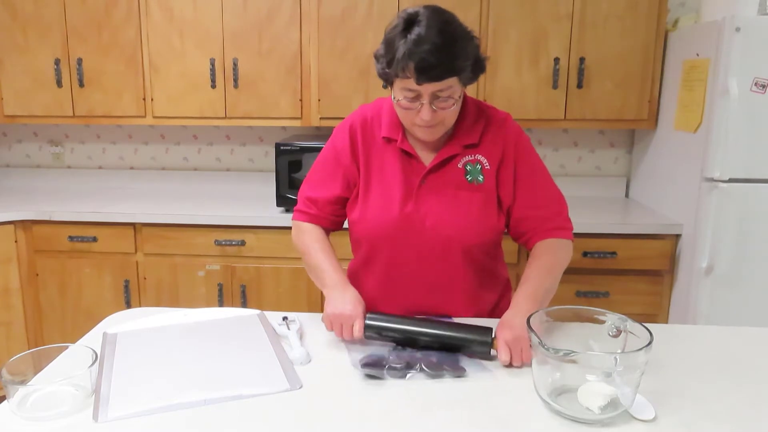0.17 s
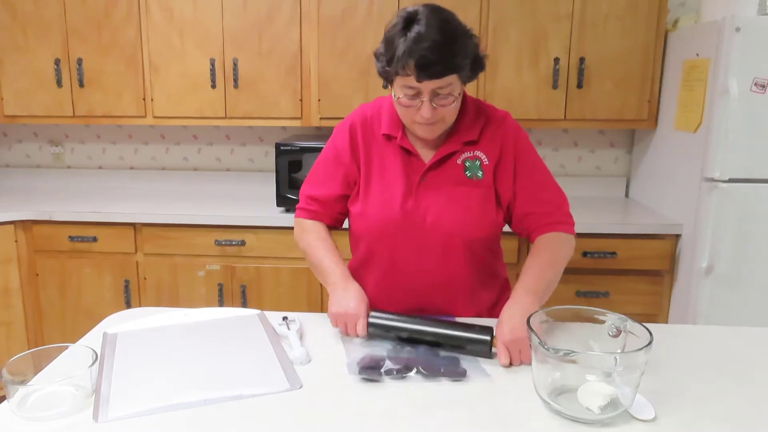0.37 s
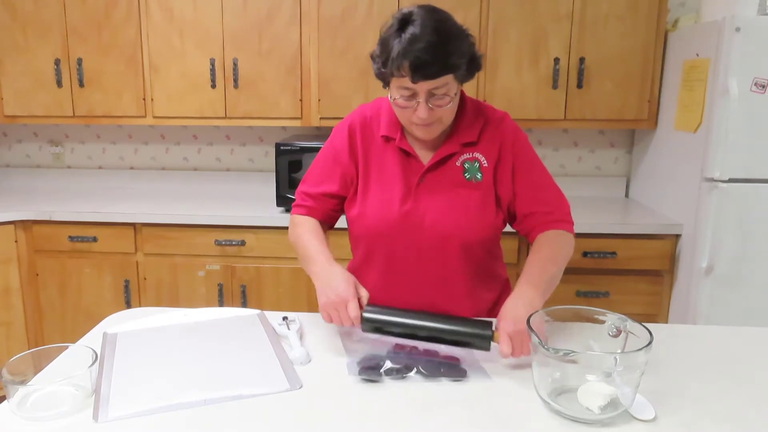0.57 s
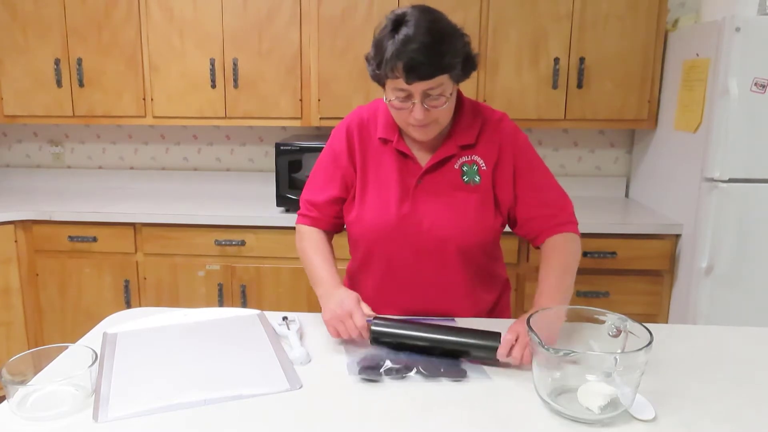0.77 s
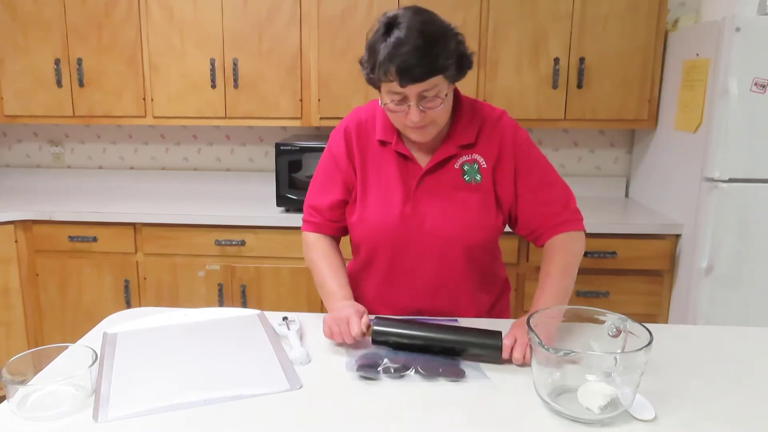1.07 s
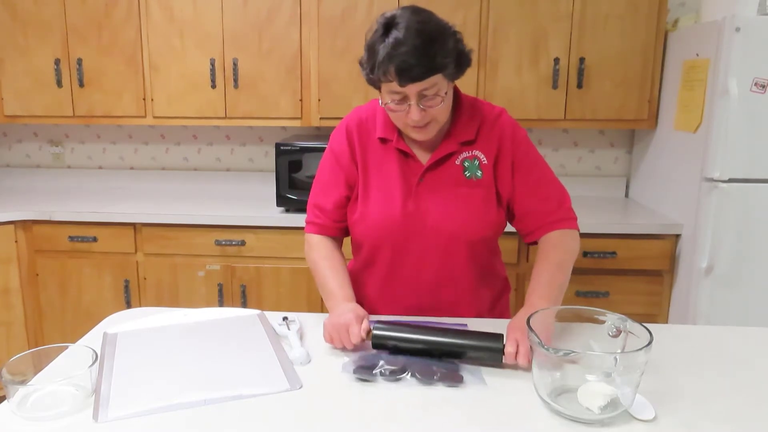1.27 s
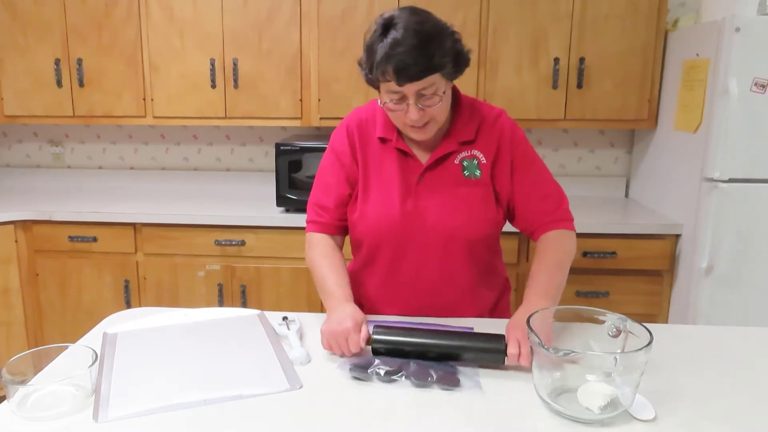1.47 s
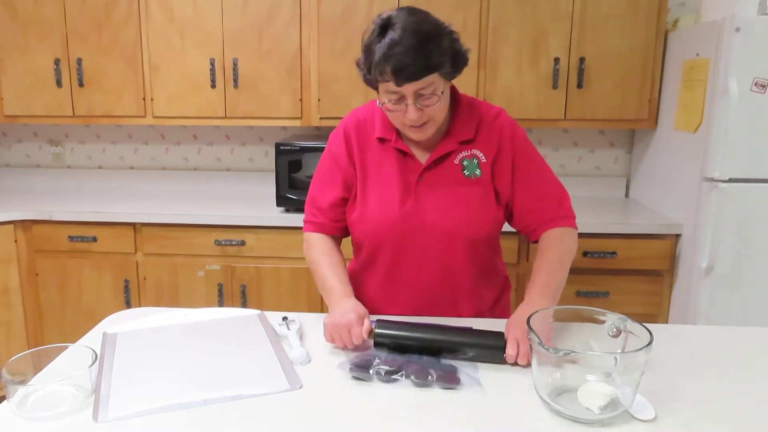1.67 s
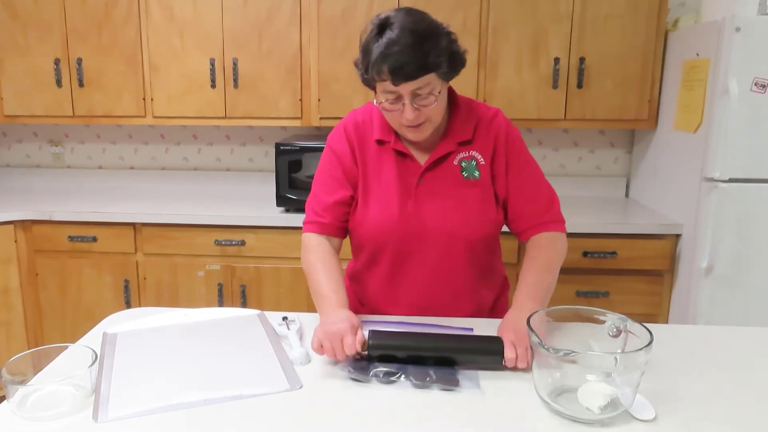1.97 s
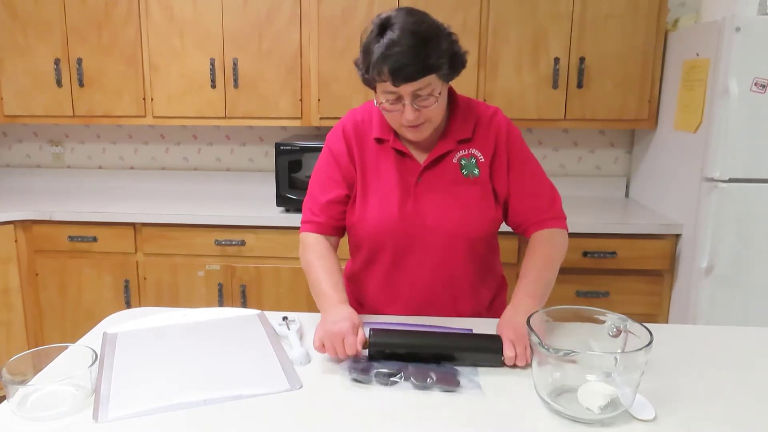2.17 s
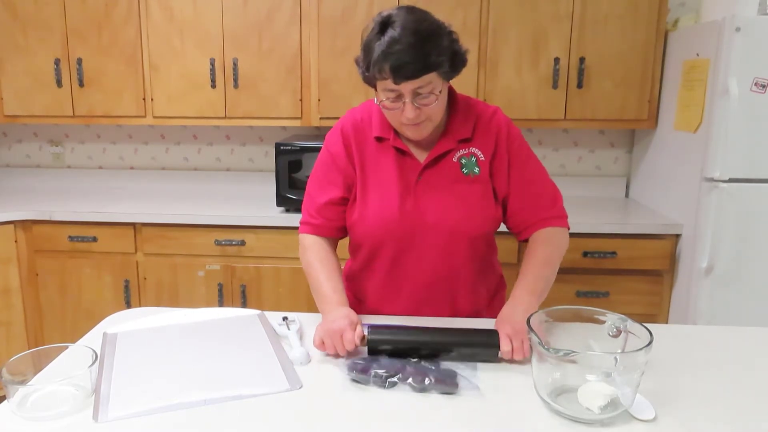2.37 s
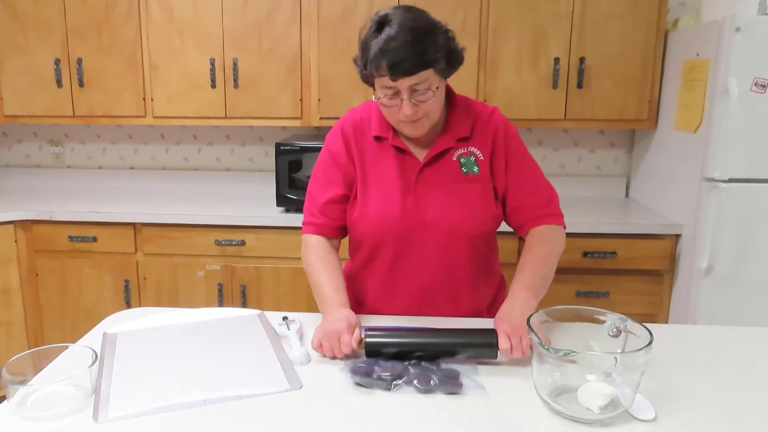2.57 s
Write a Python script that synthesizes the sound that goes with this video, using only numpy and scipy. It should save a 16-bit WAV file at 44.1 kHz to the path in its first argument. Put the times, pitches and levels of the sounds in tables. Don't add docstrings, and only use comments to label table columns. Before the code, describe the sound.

Gritty cookie crunching under a hollow rolling pin, starting faint, then a sharp crack and thuds, short grinding bursts with pauses, plastic rustle and a late handle click, heard fairly close in a small kitchen with little echo.

```python
import sys
import numpy as np
from scipy import signal
from scipy.fft import rfft, irfft, next_fast_len
from scipy.io import wavfile

SR = 44100
rng = np.random.default_rng(int(sys.argv[2]) if len(sys.argv) > 2 else 0)


def elevation(decibels):
    levels = np.asarray(decibels, float)
    return 10 ** (levels / 20)


def wav_out(sig):
    wavfile.write(sys.argv[1], SR, np.round(np.clip(np.atleast_2d(sig).T, -1, 1) * 32767).astype(np.int16))


N = 121275

# pitch_hz, density_db [dB per Hz]
GRIT_SPECTRUM = [(800, -12), (1200, 3), (1750, -5.5), (2450, 1.5), (3600, -4), (6500, -8.5), (13500, -23.5),
                 (16000, -23)]
# pitch_hz, level_db, t60_s
TABLE_MODES = [(185, -3, 0.06), (235, -3, 0.06), (305, -4, 0.045), (368, -1, 0.045), (420, -1, 0.035),
               (480, -5, 0.04), (573, -6, 0.045), (680, -3, 0.06), (738, -11, 0.035)]
# pitch_hz, level_db, t60_s
FRAME_MODES = [(43, -10, 0.28), (87.5, -4.5, 0.3), (132.4, -5, 0.08), (165.7, -10.5, 0.31),
               (206, -7.5, 0.1), (668, -16, .2)]
# pitch_hz, level_db, t60_s
BARREL_MODES = [(1026, -6, 0.037), (1200, -3.5, 0.019), (1453, -1, 0.018), (1850, -7, 0.04),
                (2400, -5.5, 0.012), (3080, -11.5, 0.014)]


def rms_one(x):
    return x / np.sqrt(np.mean(x ** 2) + 1e-20)


def along(rows):
    return np.interp(np.arange(N) / SR, *np.transpose(rows))


def filtered(x, order, hz, kind="low"):
    return signal.lfilter(*signal.butter(order, hz, kind, fs=SR), x)


def colour(x, points):
    hz, db = np.transpose(points)
    f = np.arange(1025) * SR / 2048 + 1
    octaves_outside = np.log2(np.clip(hz[0] / f, 1, None)) + np.log2(np.clip(f / hz[-1], 1, None))
    gain_db = np.interp(np.log(f), np.log(hz), db) - 20 * octaves_outside
    cepstrum = irfft(np.log(elevation(gain_db)))
    cepstrum[1:1024] *= 2
    cepstrum[1025:] = 0
    kernel = irfft(np.exp(rfft(cepstrum)))
    return signal.fftconvolve(x, kernel / np.sqrt(np.sum(kernel ** 2)))[:N]


def ring(clicks, hz, t60_s):
    radius = elevation(-60 / (max(t60_s, 0.002) * SR))
    w = 2 * np.pi * hz / SR
    return signal.lfilter([0, np.sin(w)], [1, -2 * radius * np.cos(w), radius ** 2], clicks + 1e-18)


def clicks_at(start_s, level_db):
    out = np.zeros(N)
    np.add.at(out, (np.asarray(start_s) * SR).astype(int), elevation(level_db))
    return out


def burst(start_s, level_db, t60_s):
    envelope = signal.lfilter([1], [1, -elevation(-60 / (t60_s * SR))], clicks_at(start_s, level_db))
    return envelope * rng.standard_normal(N)


def strike(start_s, level_db, modes, spread_db, share_db=lambda hz: 0):
    luck = rng.standard_normal((len(start_s), len(modes)))
    total = 0
    for k, (hz, mode_db, t60_s) in enumerate(modes):
        clicks = clicks_at(start_s, level_db + mode_db + spread_db * luck[:, k])
        total = total - ring(clicks * elevation(share_db(hz)), hz, t60_s)
    return total


def shaken(modes, gain, share_db=lambda hz: 0):
    drive = grains()
    steady = sum(elevation(db) * ring(drive, hz, t60_s) for hz, db, t60_s in modes)
    moved = sum(elevation(db) * ring(drive * gain * elevation(share_db(hz)), hz, t60_s) for hz, db, t60_s in modes)
    return moved / np.std(steady)


def through_top(x):
    return filtered(x, 2, [162.7, 875], "band")


def rolling():
    # pitch_hz, level_db, t60_s
    axle_modes = [(2350, -6, .025), (4350, -7, .03), (7020, -3, .025), (7200, -2, .012), (10200, -5, .009),
                  (10500, -5, .008), (14200, -4, .006)]
    # time_s, rattle_db [dB against the grit]
    looseness = [(0, -10), (.95, -27.5), (1.05, -6), (1.4, -6.5), (1.72, -3), (2.0, -13.5), (2.4, -11),
                 (2.75, -4)]
    # time_s, treble_db [dB]
    crumb_fineness = [(0, 10.5), (.1, 1), (.21, 3), (.28, 1), (.4, 4), (.5, -8), (.6, 2.5), (.7, -19),
                      (.8, 5.5), (.9, -3), (1.05, 8.5), (1.4, 3.7), (1.7, 3), (2.0, 0), (2.15, -0.3),
                      (2.3, 14.5), (2.5, 1.5), (2.75, 14.5)]
    grind = pressure(column=2)
    table = through_top(shaken(TABLE_MODES, pressure(column=3), lean_db))
    grit = colour(grains() * grind, GRIT_SPECTRUM) + crinkle(grind)
    coarse = signal.filtfilt(*signal.butter(2, 7500, fs=SR), grit)
    bag = coarse + elevation(along(crumb_fineness)) * (grit - coarse)
    barrel = elevation(-10.5) * shaken(BARREL_MODES, grind)
    frame = elevation(-1) * shaken(FRAME_MODES, pressure(column=4))
    axle = shaken(axle_modes, grind * elevation(along(looseness)), patch_db)
    return bag + barrel + table + frame + axle


def pressure(column):
    # [s, s, dB, dB and dB against grit]
    strokes = [(0, 0.002, -43, 1, 2.5), (0.032, 0.057, -50.5, -23.5, 0), (0.134, .19, -63.5, -20, 9),
               (0.191, 0.224, -30, 0, -35), (0.231, 0.34, -38, -2.5, 8.5), (0.317, 0.481, -27.5, 3, -11.5),
               (0.52, 0.584, -55.5, -4.5, 10.5), (0.6, 0.71, -65.5, -3, 15.5),
               (0.75, 0.847, -31.5, -18.5, 0.5), (1.047, 1.09, -42, 2, 1.5), (1.111, 1.161, -52, 11, 7),
               (1.17, 1.207, -39.5, 10, 2), (1.296, 1.466, -36.5, 7, -48), (1.425, 1.572, -44.5, 10, -3),
               (1.592, 1.687, -45.5, 0, -6), (1.649, 1.733, -40, 6.5, -22), (2.008, 2.145, -32.5, 3.5, 6),
               (2.073, 2.153, -32.5, 11.5, -14), (2.17, 2.257, -44, -7, 2), (2.347, 2.386, -46.5, 11.5, 12),
               (2.378, 2.461, -33.5, 9, -2.5), (2.521, 2.571, -45.5, -0.5, -16),
               (2.642, 2.692, -44.5, 3, -2), (2.71, 2.76, -54, -27, -5)]
    # start_s, end_s, rustle_db
    settling = [
        (0.004, 0.09, -69),
        (1.004, 1.05, -61),
        (1.223, 1.278, -50),
        (1.563, 1.586, -64.5),
        (2.296, 2.35, -58),
        (2.596, 2.647, -54),
    ]
    rows = np.array([*strokes, *[(*row, 0, -12) for row in settling]])[:, :, None]
    start_s, end_s, level_db = rows[:, 0], rows[:, 1], rows[:, 2]
    if column > 2:
        level_db = level_db + rows[:, column]
    t = np.arange(N) / SR
    sag_db_per_s, release_db_per_s = 48.5, 394
    db = level_db - sag_db_per_s * (t - start_s) - release_db_per_s * np.clip(t - end_s, 0, None)
    rise_s = 0.013 + 0.2 * (end_s - start_s)
    rise = np.clip((t - start_s) / rise_s + (start_s == 0), 0, 1)
    return np.sqrt(np.sum((rise * elevation(np.minimum(db, 0))) ** 2, axis=0))


def grains():
    grains_per_s, spread_db, clump_db = 6000, 3.5, 5
    slow = rms_one(signal.lfilter([1], [1, -0.99], rng.standard_normal(N)))
    sizes = elevation(spread_db * np.minimum(rng.exponential(1, N), 4.0)) * rng.choice([-1, 1], N)
    breaks = rng.random(N) < grains_per_s * elevation(clump_db * slow) / SR
    return rms_one(sizes * breaks)


def crinkle(grind):
    ticks_per_s = 220
    ticks = (rng.random(N) < ticks_per_s / SR) * elevation(1.2 * np.minimum(rng.exponential(1, N), 3))
    puffs = signal.lfilter([1], [1, -0.97], ticks) * rng.standard_normal(N)
    bright = filtered(rms_one(puffs) * grind, 2, 4000, "high")
    return elevation(-8) * colour(bright, GRIT_SPECTRUM)


def lean_db(hz):
    # time_s, lean_db [dB per octave]
    place = [(0, -4), (.2, -6.5), (.37, 8), (.5, 10), (.76, 2.5), (.85, 23), (1.07, -15), (1.19, -1),
             (1.32, -5.5), (1.42, 6), (1.55, -10.5), (1.7, 2.5), (1.8, -23), (2.0, 6.5), (2.1, -2.5),
             (2.38, 2), (2.55, -7.5), (2.7, -8.5)]
    return along(place) * np.log2(hz / 341)


def patch_db(hz):
    knots_per_s, changes_per_s = 40, 7.4
    knots_s = np.arange(0, N / SR + 1, 1 / knots_per_s)
    memory = np.exp(-2 * np.pi * changes_per_s / knots_per_s)
    slow = signal.lfilter([1], [1, -memory], rng.standard_normal(len(knots_s)))
    return 5.5 * np.interp(np.arange(N) / SR, knots_s, rms_one(slow))


def knocks():
    # start_s, crack_db, thud_db [table], boom_db [frame], ring_db [barrel]
    knock_events = [(0.169, -48, -67, -38, -34), (0.1984, -10.5, -27, -48, -16),
                    (0.205, -8.5, -19.5, -6.5, -6), (0.3326, -17, -29, -35, -42),
                    (0.372, -20, -9, -21.5, -11), (0.3857, -45, -22, -52, -18.5),
                    (0.757, -37, -40.5, -16.5, -25.5), (0.7659, -10, -58, -11.5, -18),
                    (1.1822, -30, -16.5, -45, -30), (1.4175, -17.5, -8.5, -20, -13.5),
                    (1.4308, -44, -17, -50, -16), (1.4544, -41, -16, -46.5, -27),
                    (1.9863, -33, -42, -25.5, -32.5), (1.9976, -15.5, -27.5, -24.5, -20.5),
                    (2.0214, -16, -52, -13.5, -20), (2.1026, -30, -8.5, -43, -21),
                    (2.1156, -65, -26, -37, -21), (2.147, -16.5, -42, -29.5, -22),
                    (2.3746, -14.5, -7, -41, -13), (2.3853, -39, -16, -14.5, -52),
                    (2.6598, -66, -32, -49, -41)]
    start_s, crack_db, thud_db, boom_db, ring_db = np.transpose(knock_events)
    crack = colour(burst(start_s, crack_db - 8, 0.038), GRIT_SPECTRUM)
    thud = through_top(strike(start_s, thud_db - 7, TABLE_MODES, spread_db=0, share_db=lean_db))
    boom = strike(start_s, boom_db - 10, FRAME_MODES, spread_db=-4.0)
    barrel = strike(start_s, ring_db - 5, BARREL_MODES, spread_db=-2)
    return crack + thud + boom + barrel


def snaps():
    # start_s, peak_db, pitch_hz
    snap_events = [(0.0532, -31.5, 1050), (0.16, -42, 3500), (0.0663, -29.5, 2350), (0.0792, -35, 2560),
                   (0.128, -46, 2950), (0.301, -32.5, 4550), (0.4129, -13, 1030), (0.4513, -16.5, 960),
                   (0.559, -35, 2780), (0.6088, -37.5, 2870), (0.7895, -33.5, 2700), (0.302, -21, 4680),
                   (2.001, -29, 2400), (1.0673, -33, 7100), (1.077, -33, 7460), (1.0982, -21.5, 1260),
                   (1.19, -25, 2530), (1.207, -32, 1190), (1.2244, -21.5, 2480), (1.304, -31, 1130),
                   (1.3156, -23, 2330), (1.3556, -19, 1940), (1.3758, -20.5, 1200), (1.562, -28, 1110),
                   (1.6459, -32, 1150), (1.6778, -23, 4400), (1.7298, -30, 7100), (2.3493, -35, 1180),
                   (1.827, -37, 2300), (0.0699, -37, 1060), (2.4868, -28.5, 2800), (2.5345, -32, 7140)]
    t60_s = 0.02
    start_s, peak_db, _ = np.transpose(snap_events)
    rings = sum(ring(clicks_at([s], [db - 7.5]), hz, t60_s) for s, db, hz in snap_events)
    ticks = np.diff(burst(start_s, peak_db - 14, t60_s), prepend=0)
    return colour(ticks, GRIT_SPECTRUM) + rings


def folds():
    # start_s, peak_db
    fold_events = [(0.1925, -41), (0.209, -11), (0.2174, -34.5), (0.2294, -34), (0.2974, -19.5),
                   (0.301, -26), (0.413, -17), (0.4484, -33), (0.4664, -34), (0.5566, -53), (0.5694, -58),
                   (0.611, -41), (0.788, -25), (0.8001, -25), (0.8124, -29), (0.8214, -34), (0.8454, -35),
                   (0.9622, -47), (0.9854, -55.5), (1.0342, -35.5), (1.0645, -35), (1.1258, -40),
                   (1.3224, -43), (1.6142, -37), (1.9992, -26), (2.0413, -27), (2.0554, -27), (2.066, -20),
                   (2.0887, -20), (2.1024, -25), (2.1254, -20), (2.144, -33), (2.1914, -40), (2.363, -34),
                   (2.4059, -44), (2.4854, -21.5), (2.6419, -39), (2.6683, -46)]
    # start_s, peak_db
    flap_events = [
        (0.5567, -35.5),
        (0.6093, -37.5),
    ]
    start_s, peak_db = np.transpose(fold_events)
    puffs = filtered(burst(start_s, peak_db - 10.5, 0.009), 2, 4000, "high")
    flaps = filtered(burst(*np.transpose(flap_events), 0.14), 3, 2300, "high")
    return puffs + filtered(flaps, 2, 4650)


def tap():
    # start_s, peak_db
    tap_events = [
        (1.832, -22.5),
    ]
    # pitch_hz, level_db, t60_s
    handle_modes = [(885, 5, 0.07), (1270, 4, 0.016), (1394, -3, 0.02), (2309, 1, 0.13), (2480, 3, .016),
                    (2950, -13, .08), (4355, -19, 0.2), (5486, -15, .08), (7047, -5, 0.025)]
    # pitch_hz, density_db [dB per Hz]
    crack_spectrum = [(900, -3), (1300, -3), (2500, -4), (5500, -0.5), (8000, -21), (11000, -20)]
    bounce_s, bounce_db = 0.00165, -5.5
    start_s, peak_db = np.transpose(tap_events)
    hits_s = np.r_[start_s, start_s + bounce_s]
    hits_db = np.r_[peak_db, peak_db + bounce_db]
    rings = strike(hits_s, hits_db - 14, handle_modes, spread_db=0)
    crack = elevation(-8) * colour(burst(start_s, peak_db, 0.016), crack_spectrum)
    thud = strike(start_s, peak_db - 24, TABLE_MODES[1:4], spread_db=0)
    return filtered(rings + crack, 3, [720, 9000], "band") + thud


def kitchen(x):
    t60_s, wall_cut_hz = 0.24, 9000
    size = next_fast_len(N + SR)
    z = np.exp(-2j * np.pi * np.arange(size // 2 + 1) / size)
    dull = np.exp(-2 * np.pi * wall_cut_hz / SR)
    wall = (1 - dull) / (1 - dull * z)
    lags = (rng.uniform(0.008, 0.035, size=10) * SR).astype(int)
    tail = 0
    for k, lag in enumerate(lags):
        loop = elevation(-60 * lag / SR / t60_s) * wall * z ** lag
        tail = tail + (-1) ** k * loop / (1 - loop)
    return irfft(rfft(x, size) * tail, size)[:N]


def room_tone():
    # pitch_hz, density_db [dB per Hz]
    air_spectrum = [(30, -22.5), (90, -6), (200, -17.5), (700, -27.5), (1100, -30), (4300, -33),
                    (7000, -32.5), (9500, -38.5)]
    return elevation(-61) * colour(rng.standard_normal(N), air_spectrum)


def scene():
    dry = rolling() + knocks() + snaps() + folds() + tap()
    return (dry + elevation(-17) * kitchen(dry) + room_tone())[None]


def top_cut(x):
    return signal.sosfilt(signal.butter(12, 16370, fs=SR, output="sos"), x)


def record(dry):
    echo_hz, sharpness, echo_share = 788, 6, 0.62
    x = dry - echo_share * signal.lfilter(*signal.iirpeak(echo_hz, sharpness, fs=SR), dry)
    peak_limit = 0.45
    x = filtered(peak_limit * np.tanh(x / peak_limit), 3, 41, "high")
    x = signal.sosfilt(signal.cheby2(12, 50, 16300, fs=SR, output="sos"), x)
    return top_cut(x)


dry = scene()
out = record(dry)
wav_out(out)
```